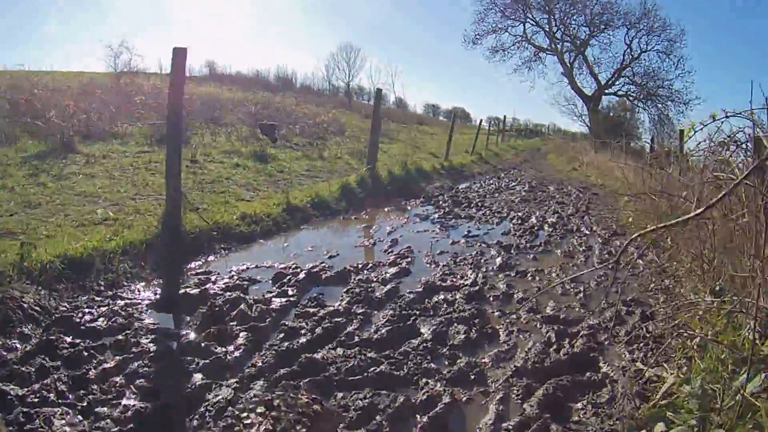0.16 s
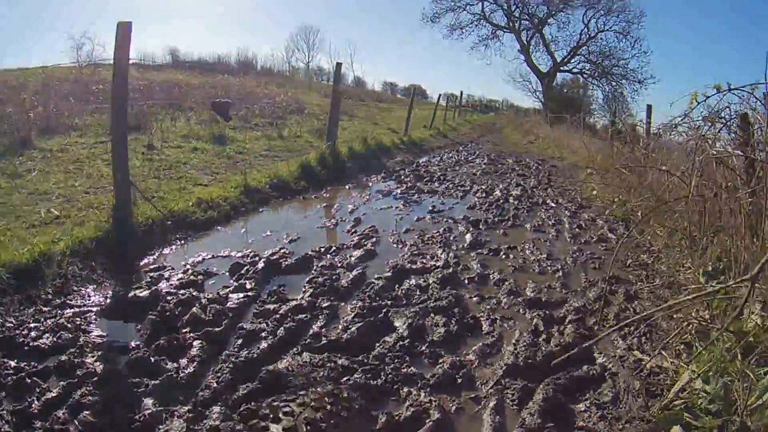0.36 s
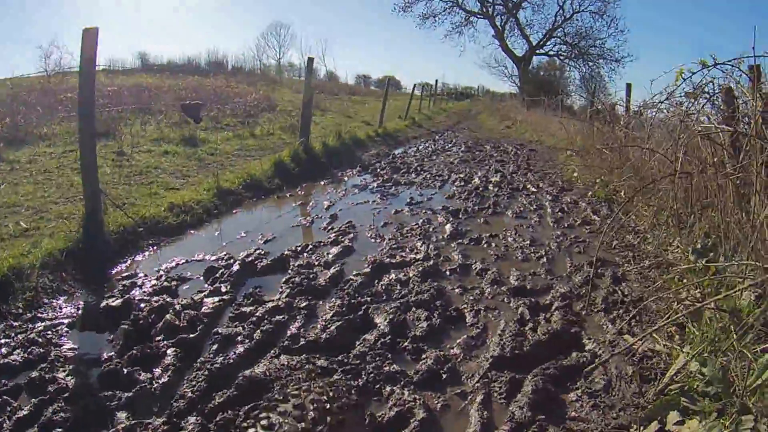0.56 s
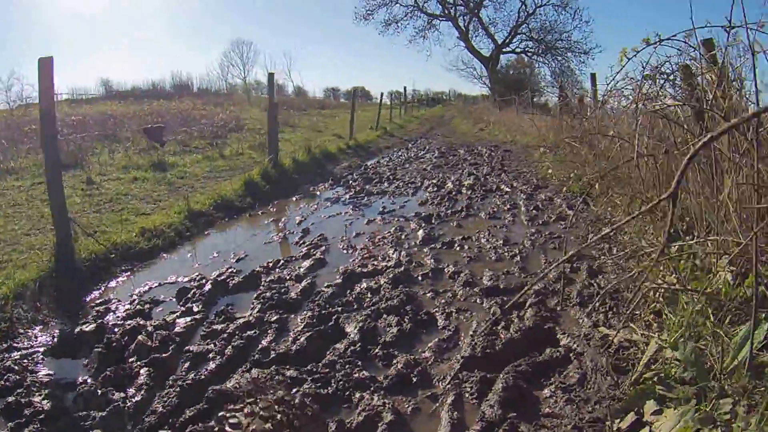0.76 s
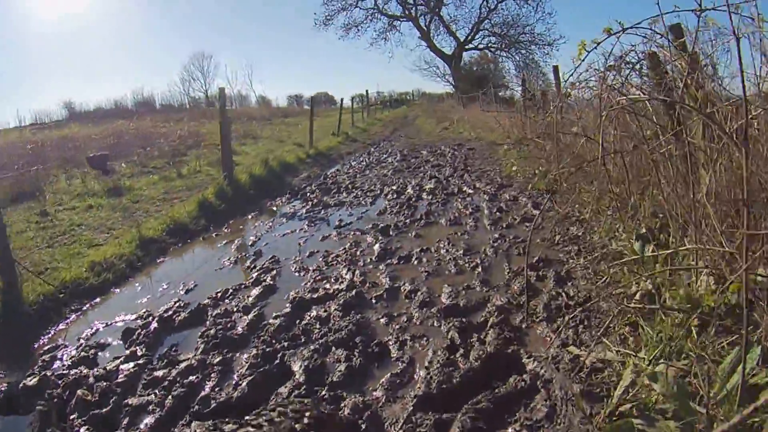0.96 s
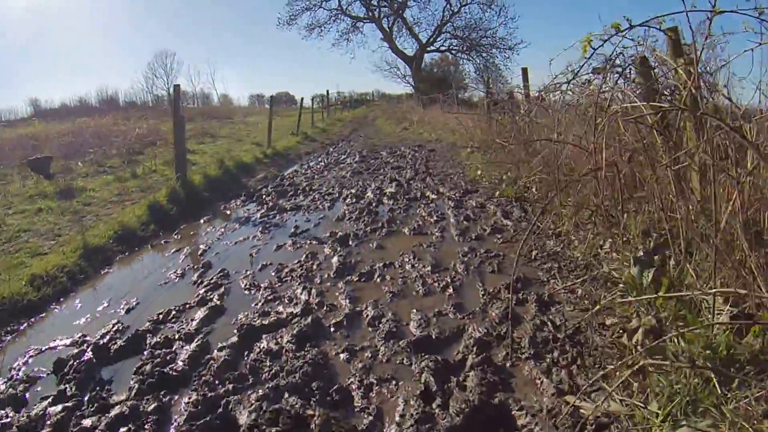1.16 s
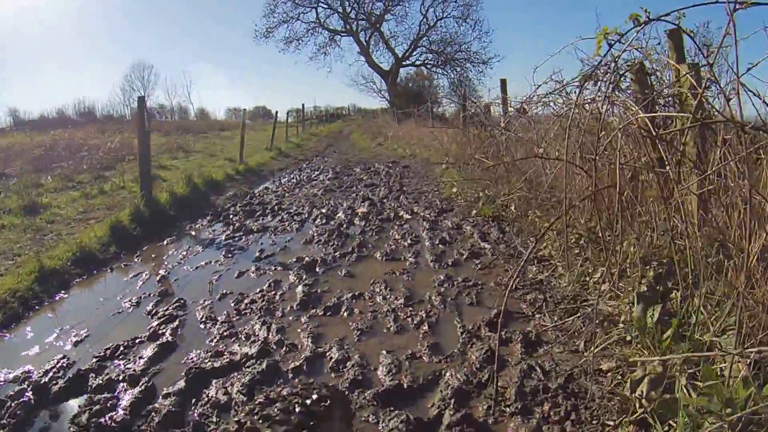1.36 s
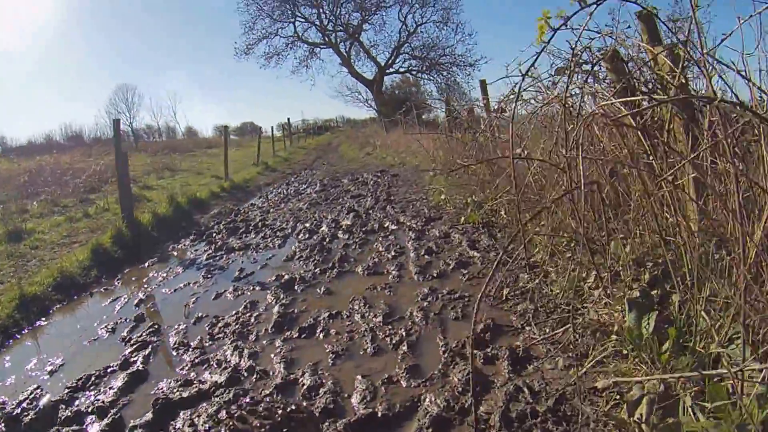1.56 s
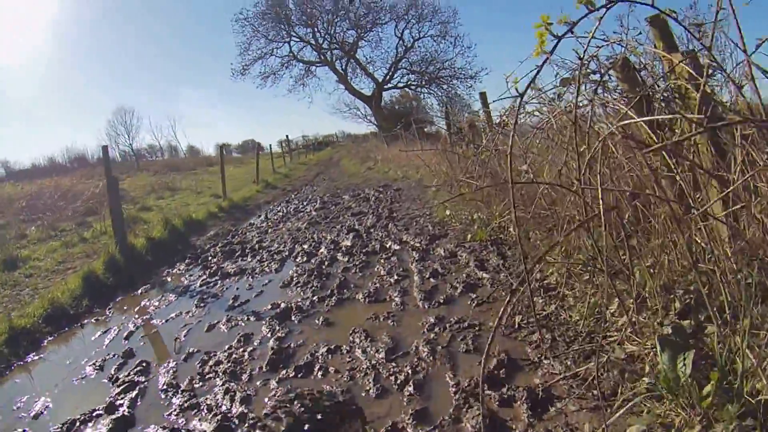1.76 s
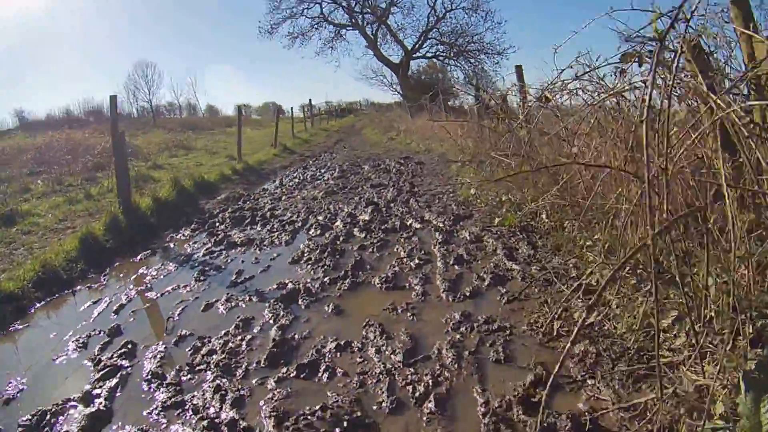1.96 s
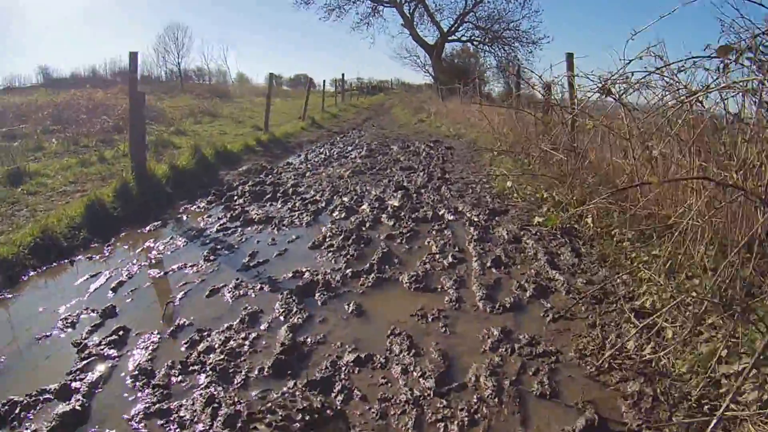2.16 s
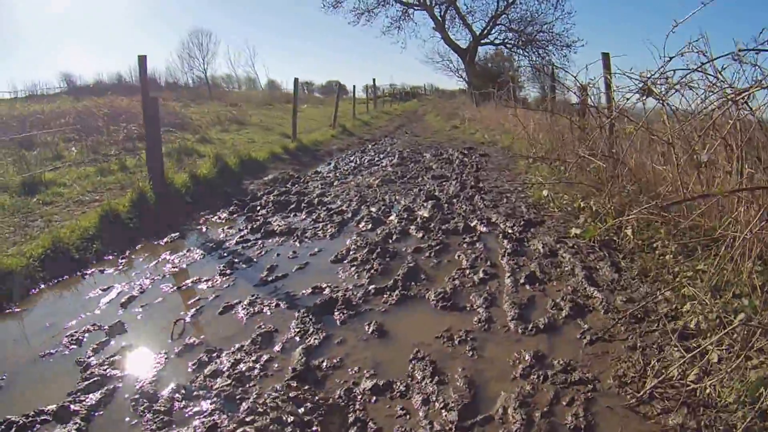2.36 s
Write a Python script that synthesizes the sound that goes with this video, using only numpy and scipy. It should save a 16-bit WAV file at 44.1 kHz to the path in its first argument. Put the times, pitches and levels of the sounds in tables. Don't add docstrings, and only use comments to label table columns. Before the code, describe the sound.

Bicycle tyres fizz through sticky mud, with a sudden loud burst of snapping twigs and knocks

```python
import sys
import numpy as np
from scipy import signal
from scipy.fft import rfft, irfft, next_fast_len
from scipy.io import wavfile
from scipy.ndimage import uniform_filter1d, map_coordinates

SR = 44100
rng = np.random.default_rng(int(sys.argv[2]) if len(sys.argv) > 2 else 0)


def to_wav(sig):
    pcm = np.clip(np.atleast_2d(sig), -1, 1) * 32767
    pcm = np.round(pcm).astype(np.int16)
    wavfile.write(sys.argv[1], SR, pcm.T)


def volts_from_db(level):
    exponent = np.asarray(level, float) / 20
    return 10 ** exponent


N = 105840
DELAY_S = 0.0008


def unit(x):
    return x / np.sqrt(np.mean(x ** 2) + 1e-20)


def sample_index(s):
    return np.round(s * SR).astype(int)


def curve(rows):
    return np.interp(np.arange(N) / SR, *np.transpose(rows))


def wobble(rate):
    knots = rng.standard_normal(int(N * rate / SR) + 4)
    return map_coordinates(knots, [np.arange(N) * rate / SR])


def coloured(x, points):
    f, db = np.transpose(points)
    hz = np.fft.rfftfreq(8192, 1 / SR)
    level_db = np.interp(np.log(hz + 1), np.log(f + 1), np.maximum(db, -60))
    cepstrum = irfft(np.log(volts_from_db(level_db)))
    cepstrum[1:4096] *= 2
    cepstrum[4097:] = 0
    h = irfft(np.exp(rfft(cepstrum)))
    return signal.fftconvolve(x, h / np.linalg.norm(h))[:N]


def bursts(s, db, t60):
    lead_db, lead_s = -17, 0.00049
    spike, spike_t60 = 1.6, 0.0018
    k = np.arange(-200, 900)
    t = np.maximum(k / SR, 0)
    fall = volts_from_db(-60 * t / np.maximum(t60, 1e-3)[..., None]) + spike * volts_from_db(-60 * t / spike_t60)
    lead = volts_from_db(lead_db) * np.exp(np.minimum(k, 0) / SR / lead_s)
    shape = np.where(k < 0, lead, fall)
    at = np.clip(sample_index(s)[:, None] + k, 0, N)
    return np.bincount(at.ravel(), (volts_from_db(db)[:, None] * shape).ravel(), N + 1)[:N]


def grains(rate, spread_db, t60):
    count = int(np.clip(rate * N / SR, 1, 3000))
    when, strength, length = rng.random((3000, 3))[:count].T
    return unit(bursts(when * N / SR, -spread_db * np.log(strength + 0.08), t60 * (0.5 + length)))


def noise():
    patch_db = 2.5
    z = signal.stft(rng.standard_normal(N), nperseg=128)[2]
    over_pitch = uniform_filter1d(rng.standard_normal(z.shape), 5, 0)
    patches = unit(uniform_filter1d(over_pitch, 7, 1))
    return unit(signal.istft(z * volts_from_db(patch_db * patches), nperseg=128)[1][:N])


def rings(rows, rise, scatter, attack_s):
    out, t, wander = np.zeros(N + SR), np.arange(SR // 4) / SR, wobble(60.4)
    for s, db, hz, t60 in rows:
        i = round(s * SR)
        pitch = hz * (1 + rise * t + scatter * np.resize(wander[i:], len(t)))
        envelope = volts_from_db(db - 60 * t / t60) * (1 - np.exp(-t / attack_s))
        out[i:i + len(t)] += envelope * np.sin(2 * np.pi * np.cumsum(pitch) / SR)
    return out[:N]


# (f/Hz, level/dB)
BRIGHT = [(1760, -15.5), (3500, -18.5), (7000, -8.5), (8050, -3.5), (9450, -9), (13600, -0.5),
          (15800, -1.5)]
# (f/Hz, level/dB)
DULL = [(300, 3.5), (700, -0.5), (1500, 1.5), (3000, -0.5), (5000, -1.5), (8000, -8)]


def cracks(rows, t60, colour, size):
    s, db, low_db = np.transpose(rows)
    s, t60 = s + DELAY_S, np.full(len(s), t60)

    def burst_noise(level_db):
        return uniform_filter1d(bursts(s, level_db, t60), size) * noise()

    return coloured(burst_noise(db - 5), colour) + coloured(burst_noise(db + low_db + 4), DULL)


# (t/s, peak level/dB, low part over it/dB)
SNAPS = [(0.4963, -45, 11), (0.506, -4, -12.5), (0.5115, -30.5, 0.5), (0.5179, -29, -10),
         (0.5465, -28, -20), (0.6038, -12, -21.5), (0.6072, -9, -28), (0.612, -25, -30),
         (0.609, -15.5, -35), (0.637, -16, -12), (0.648, -9.5, -24), (0.6575, -18, -11),
         (0.668, -11.5, -18), (0.7, -27, -24), (0.741, -21.5, -6), (0.7468, -17, -9.5), (0.759, -12, -28),
         (0.769, -21, -16), (0.78, -10.5, -13.5), (0.7995, -25, -14), (0.797, -22, -9.5),
         (0.8038, -18, -30), (0.9012, -18.5, -15.5), (0.9041, -4.5, -48), (0.9355, -7.5, -30),
         (0.9852, -7.5, -39), (0.987, -8.5, -48), (0.9941, -11, -32), (1.0597, -12, -16.5),
         (1.0901, -32, -24)]


def snaps():
    return cracks(SNAPS, 0.011, BRIGHT, size=3)


# (t/s, peak level/dB, low part over it/dB)
TWIGS = [(0.3212, -25, -16), (0.4338, -35, -12), (0.5066, -16, -9), (0.5187, -18, -7), (0.5479, -14, -8),
         (0.5569, -11.5, -8), (0.6175, -19.5, -9), (0.7012, -27, -1), (0.7416, -15, -6), (0.7513, -19, -9),
         (0.7819, -12.5, -11), (0.8434, -25, -5), (0.9054, -19, -6), (0.9089, -14.5, -13),
         (0.9286, -16.5, -20), (1.0096, -29, -8), (1.0604, -6.5, -11), (1.3085, -26, -20),
         (2.1036, -32.5, -8)]


def twigs():
    blow_db, tail_t60 = 8, 0.0055
    s, db, low_db = np.transpose(TWIGS)

    def blows(level_db):
        return np.bincount(sample_index(s), volts_from_db(level_db + blow_db), N)

    tail_rows = np.transpose([s - DELAY_S, db - 9, low_db - 3])
    tail = cracks(tail_rows, tail_t60, BRIGHT, size=3)
    return coloured(blows(db), BRIGHT) - coloured(blows(db + low_db), DULL) + tail


# (start t/s, length/s, level/dB, low part over it/dB)
SCRAPES = [(0.523, 0.01, -31, -10.5), (0.542, 0.0093, -25, -2.5), (0.565, 0.031, -48.5, 12.5),
           (0.596, 0.02, -38.5, 4), (0.606, 0.005, -29, -15), (0.624, 0.022, -33.5, -6),
           (0.644, 0.036, -23, -14.5), (0.679, 0.025, -34, -22), (0.706, 0.014, -40, -29),
           (.738, 0.0055, -31, 3.5), (0.747, 0.0058, -26, -17), (0.755, 0.031, -22, -19),
           (0.794, 0.014, -29, -10), (0.807, .022, -29.5, -3), (0.854, 0.012, -32, -6.5),
           (0.875, 0.0094, -27.5, -11), (0.885, 0.018, -28, -20), (0.866, 0.006, -39, -10),
           (0.907, 0.018, -37, -4.5), (0.934, 0.014, -29, -38), (0.954, 0.007, -40, -9.5),
           (0.984, 0.01, -23, -34), (0.992, 0.015, -38, -15), (1.05, 0.03, -41, -15),
           (1.18, 0.21, -38.5, -17), (1.44, 0.057, -44, -13), (1.494, 0.045, -47.5, 0),
           (1.57, 0.03, -62, 8.5), (1.835, 0.05, -64, 9), (1.936, 0.037, -64, 7.5),
           (2.094, 0.045, -40.5, -17)]


def scrapes():
    edge_s = 0.0036
    t = np.arange(N) / SR
    high, low = np.zeros((2, N))
    for s, length, db, low_db in SCRAPES:
        inside = np.minimum(t - s, s + length - t)
        gate = np.clip(inside / edge_s + 0.5, 0, 1) ** 2
        high += volts_from_db(db) * gate
        low += volts_from_db(db + low_db) * gate
    rasp = unit(1 + grains(rate=1400, spread_db=1, t60=0.0061))
    return coloured(high * rasp * noise(), BRIGHT) + coloured(low * rasp * noise(), DULL)


# (t/s, peak level/dB, f/Hz, t60/s)
JOLTS = [(0.502, -23, 141, 0.08), (0.513, -33, 324, 0.031), (0.589, -22, 308, .03), (.5995, -9, 528, 0.022),
         (0.701, -16.5, 405, 0.013), (.611, -19, 441, 0.031), (.657, -30.5, 255, 0.089),
         (0.74, -24.5, 239, 0.039), (.75, -29.5, 89.7, 0.25), (0.775, -26, 238, 0.055),
         (0.748, -19.5, 744, 0.035), (0.898, -23.5, 234, 0.1), (1.057, -31.5, 287, 0.047)]
# (f/Hz, level/dB)
THUD = [(70, -23), (250, -2.5), (500, -3.5), (1000, -10), (2000, -28.5)]


def jolts():
    thud_db, sway_db = -15, -12.5
    t = np.arange(N) / SR
    shake = np.zeros(N)
    for s, db, _, t60 in JOLTS:
        shake += (t > s) * volts_from_db(db - 60 * np.abs(t - s) / (2.31 * t60))
    thud = volts_from_db(thud_db) * coloured(uniform_filter1d(shake, 200) * noise(), THUD)
    low_noise = coloured(rng.standard_normal(N), RUMBLE[1:])
    sway = volts_from_db(sway_db) * uniform_filter1d(shake, 3000) * low_noise
    return rings(JOLTS, rise=0, scatter=0.06, attack_s=0.0023) + thud + sway


# (t/s, peak level/dB, low part over it/dB)
TICKS = [(0.2241, -22, -18), (0.2415, -25, -38), (0.252, -24, -45), (0.3198, -17, -31),
         (0.3372, -26.5, -15.5), (0.351, -29, -26), (0.364, -28.5, -15), (0.3814, -28, -28),
         (0.4327, -29, -13.5), (1.119, -28, -31), (1.2265, -28, -34), (1.2932, -24.5, -10.5),
         (1.3272, -27, -11), (1.44, -22.5, -29), (1.49, -28.5, -32), (1.5654, -48, -8), (1.7993, -33, -44),
         (2.0888, -33, -29), (2.101, -25, -25), (2.156, -32, -20.5), (2.128, -41.5, -20), (2.207, -38, -30),
         (2.2567, -28.5, -18.5), (2.3391, -31.5, -30), (2.356, -30, -39), (2.3845, -27, -22)]


def ticks():
    return cracks(TICKS, 0.014, FIZZ, size=25)


# (t/s, peak level/dB, f/Hz, t60/s)
BUBBLES = [(.225, -48.5, 850, 0.078), (.36, -46, 630, 0.14), (1.23, -38, 704, 0.023),
           (1.37, -34.5, 994, 0.029), (1.395, -37, 1030, 0.023), (1.46, -28.5, 4090, 0.021),
           (1.566, -33.5, 1630, 0.0087), (1.588, -34.5, 1550, 0.0086), (2.102, -29, 3500, 0.01),
           (2.032, -42.5, 657, 0.051), (2.103, -41.5, 680, 0.019), (.547, -24, 1460, 0.026)]


def bubbles():
    return rings(BUBBLES, rise=1.8, scatter=0, attack_s=0.00043)


# (t/s, peak level/dB, f/Hz, width/ms)
PINGS = [(0.155, -37, 13000, 1.5), (0.167, -38, 8500, .9), (0.2085, -27, 14000, .5),
         (0.3665, -30, 15000, .8), (0.372, -31, 15000, .7), (0.574, -28, 14500, .5),
         (0.8825, -30, 3600, .5), (0.954, -31, 13500, .8), (0.9585, -31, 12000, .6),
         (1.0665, -31, 13000, .8), (1.0775, -30, 13000, 1.2), (1.0776, -37, 5400, 1),
         (1.083, -28, 13000, 1.4), (1.0875, -28, 13500, .9), (1.0913, -22, 11200, .6),
         (1.107, -38, 6200, 1.2), (1.1226, -25, 15200, .7), (1.149, -34, 14800, .6),
         (1.1662, -23, 14800, .5), (1.2455, -27, 13000, .8), (1.488, -31, 7500, .5),
         (1.4912, -21, 14500, .6), (1.607, -37, 15000, .9), (1.729, -37, 15000, .8),
         (1.746, -36, 14000, .8), (2.0898, -26, 13500, .5), (2.1035, -34, 5500, 1.1),
         (2.1715, -35, 14500, .8), (2.189, -27, 14000, .5), (2.192, -42, 3100, 1.3),
         (2.2085, -28, 11200, .6), (2.235, -37, 14500, .9), (2.286, -36, 14000, .8),
         (2.3855, -33, 7000, .5)]


def pings():
    roughness = 0.8
    s, db, hz, ms = np.transpose(PINGS)[..., None]
    k = np.arange(-200, 200)
    grit = uniform_filter1d(rng.standard_normal((len(s), len(k))), size=3, axis=1)
    swell = np.exp(-(k / SR * 1000 / np.maximum(ms, 0.2)) ** 2)
    tone = volts_from_db(db - 4) * swell * (1 + roughness * 2 * grit) * np.sin(2 * np.pi * hz * k / SR)
    return np.bincount((sample_index(s) + k).ravel(), tone.ravel(), N)


# (t/s, level/dB)
SQUELCH = [(0, -40.5), (.11, -52), (.2, -46), (.36, -41), (.6, -44), (.72, -48.5), (.95, -40), (1.15, -47),
           (1.5, -41), (1.56, -53.5), (1.7, -51), (1.9, -49.5), (2.03, -45), (2.2, -47.5), (2.4, -52.5)]
# (f/Hz, level/dB)
FIZZ = [(3000, -30), (5200, -11.5), (10000, -4), (15000, 0.5)]


def tyres():
    crackle_db, squish_db = -8, -10
    load = volts_from_db(curve(SQUELCH) + 1.5 * wobble(25))
    crackle = grains(rate=160, spread_db=4, t60=0.013)
    drive = load * (0.61 + volts_from_db(crackle_db) * crackle)
    return coloured(drive * noise(), FIZZ) + volts_from_db(squish_db) * coloured(load * noise(), DULL)


# (f/Hz, level/dB)
RUMBLE = [(7.1, -7.5), (12, 1.5), (180, -5), (216, -6.5), (365, -18.5), (421, -20.5), (900, -31),
          (1170, -73), (1980, -120)]
# (f/Hz, level/dB)
MIDS = [(350, -57), (600, -16), (735, -13), (778, -19), (1980, -4.5), (6000, -31), (7800, -28),
        (13200, -120)]


def field():
    rumble_db, wash_db = -48.5, -63
    low, far = rng.standard_normal((2, N))
    rumble = volts_from_db(rumble_db) * unit(coloured(low, RUMBLE))
    return rumble + volts_from_db(wash_db) * unit(coloured(far, MIDS))


def scene():
    near = snaps() + scrapes() + jolts()
    mud = ticks() + bubbles() + tyres()
    return (near + mud + field() + twigs() + pings())[None]


def treble_gaps(x):
    gap_share, low_hz, high_hz = 0.13, 4800, 11500
    hz, _, z = signal.stft(x, SR, nperseg=512)
    chosen = rng.random((65, z.shape[-1] // 5 + 1)) < gap_share
    gaps = np.kron(chosen, np.ones((4, 5)))[:len(hz), :z.shape[-1]]
    power = np.sum(np.abs(z[0]) ** 2, 0)
    quiet = power < 3 * np.quantile(power, 0.7)
    treble = (hz > low_hz) & (hz < high_hz)
    gaps = gaps * treble[:, None] * quiet
    return signal.istft(z * (1 - 0.9 * gaps), SR, nperseg=512)[1][:, :N]


def roll_off(x):
    return signal.sosfilt(signal.butter(12, 16970, fs=SR, output="sos"), x)


def record(dry):
    ceiling, top_hz, offset = 0.36, 15900, -0.0011
    x = treble_gaps(dry / (1 + np.abs(dry / ceiling) ** 4) ** 0.25)
    m = next_fast_len(N)
    band = np.clip((top_hz - np.fft.rfftfreq(m, 1 / SR)) / 150, 0, 1)
    mix = irfft(rfft(x, m) * band, m)[:, :N] + offset
    return roll_off(mix)


dry = scene()
out = record(dry)
to_wav(out)
```